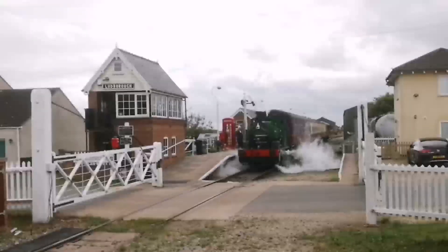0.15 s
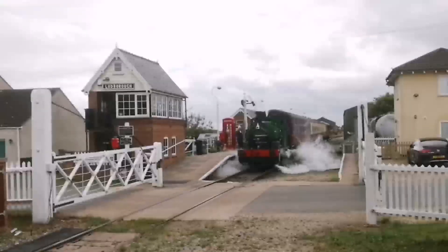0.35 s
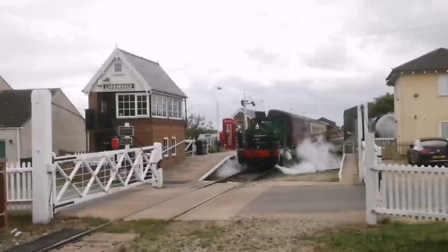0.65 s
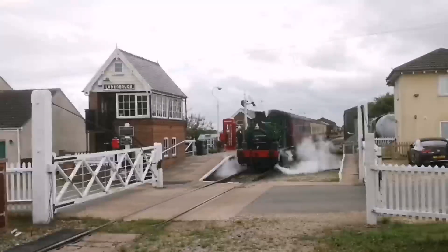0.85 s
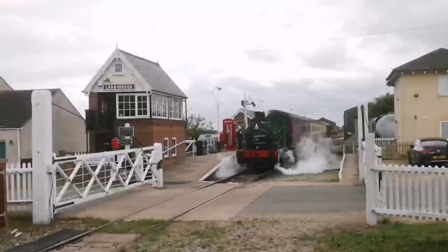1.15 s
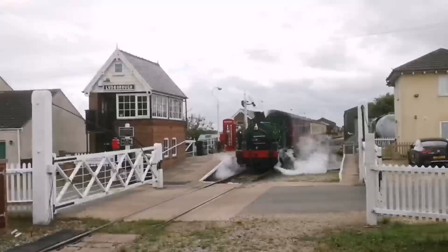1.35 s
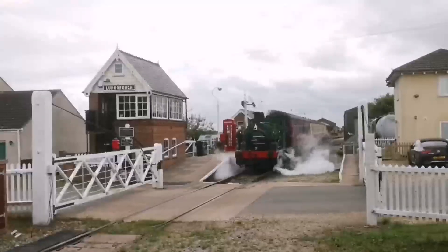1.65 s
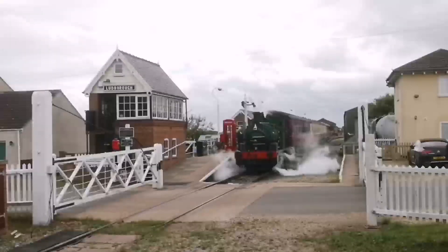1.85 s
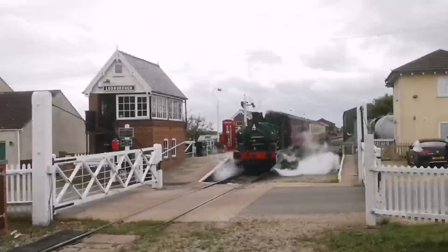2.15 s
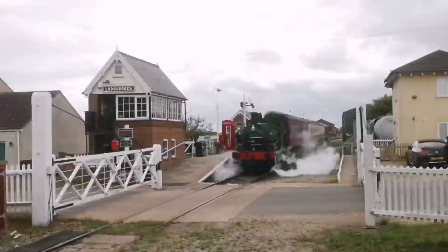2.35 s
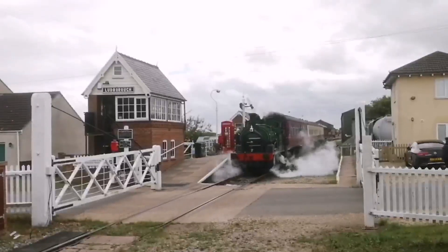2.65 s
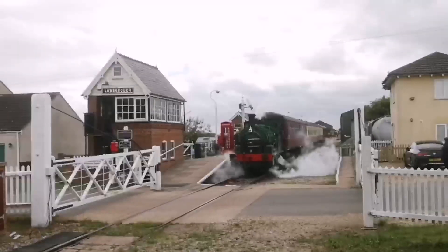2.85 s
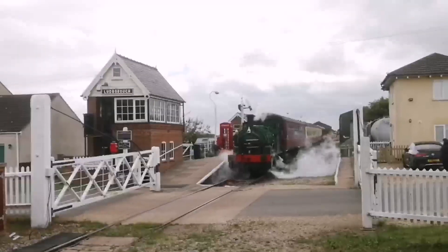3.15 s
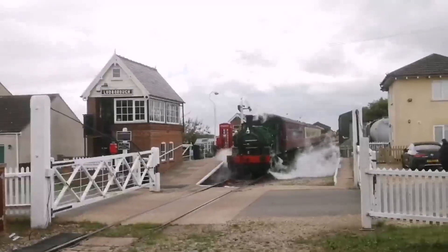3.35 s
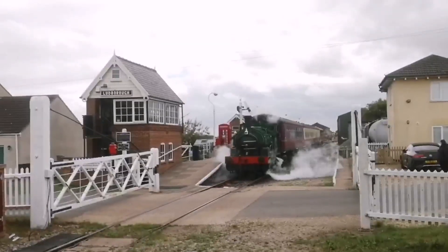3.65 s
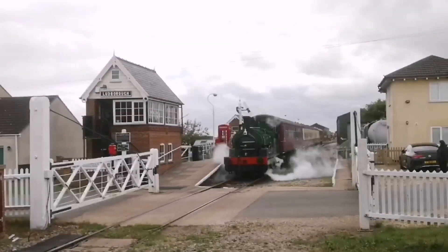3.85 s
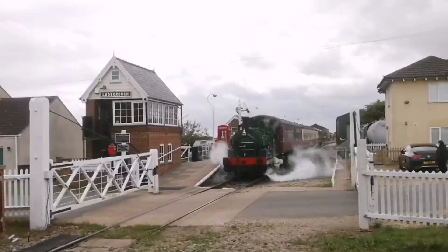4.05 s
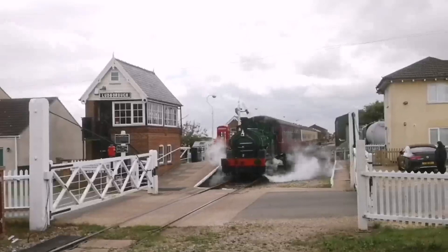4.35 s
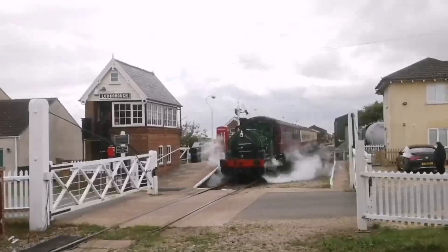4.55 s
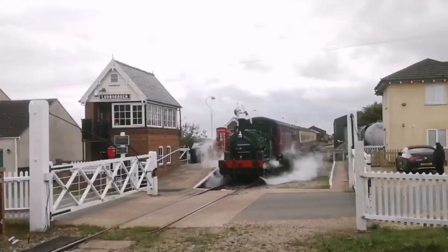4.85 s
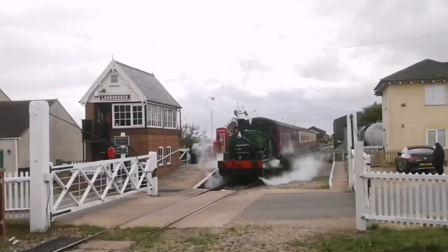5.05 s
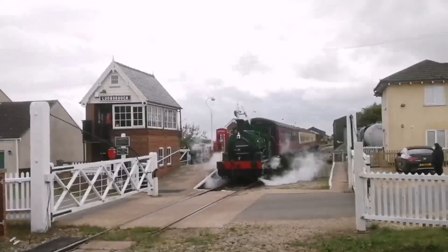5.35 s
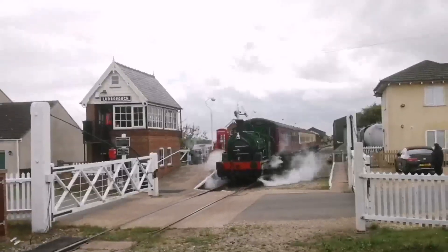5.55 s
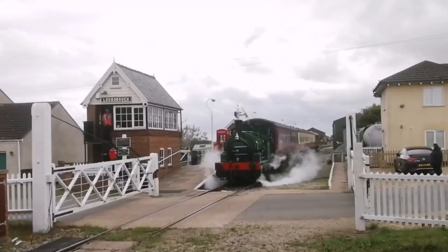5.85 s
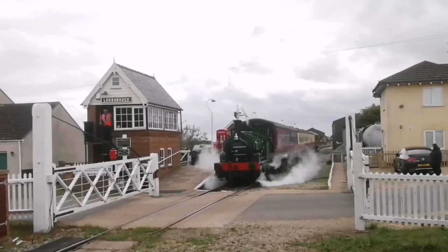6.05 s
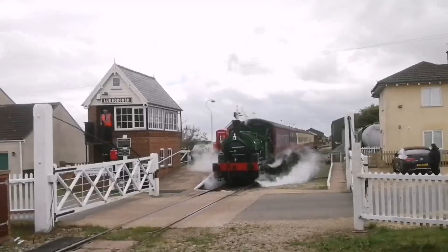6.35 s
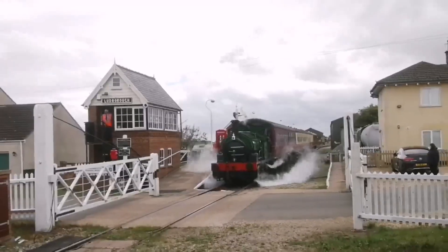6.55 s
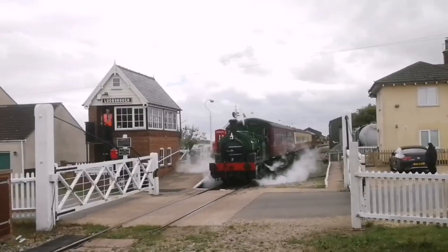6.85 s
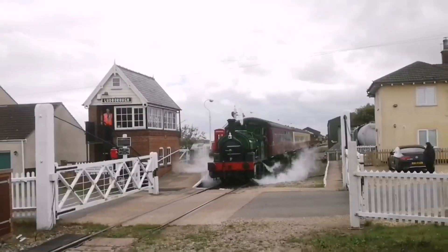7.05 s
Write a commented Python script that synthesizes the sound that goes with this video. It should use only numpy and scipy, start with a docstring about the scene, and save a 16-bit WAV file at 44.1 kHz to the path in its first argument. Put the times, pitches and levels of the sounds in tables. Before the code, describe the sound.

Bright steam hiss swells and eases from a slow locomotive over a faint low hum, until wind briefly buffets the microphone.

```python
"""Steam locomotive with open drain cocks

A locomotive creeps towards a level crossing, some thirty metres off. Spray hisses, steam rings the drain
pipes and the cloud's roar swells with each slow piston stroke. The chimney puffs softly and an engine
idles nearby with a low hum. Late on, gusts of wind thump on the microphone."""
import sys
import numpy as np
from scipy import signal
from scipy.fft import rfft, irfft, next_fast_len
from scipy.io import wavfile

SR = 44100
rng = np.random.default_rng(int(sys.argv[2]) if len(sys.argv) > 2 else 0)


def log_audio(samples):
    """Write samples as a 16-bit WAV file to the path given in sys.argv[1]."""
    # one column per channel
    frames = np.atleast_2d(samples).T
    # limit to full scale, then quantise
    limited = np.clip(frames, -1, 1)
    pcm = np.round(limited * 32767).astype(np.int16)
    wavfile.write(sys.argv[1], SR, pcm)


N = 317961

# Fine spray at the nozzles, until the cocks shut near the end.
# Each row: time in seconds, relative level in dB.
SPRAY_LEVEL = [(0, -42.5), (.4, -43.5), (.65, -38.5), (1.08, -37.5), (1.15, -35), (1.9, -35.5),
               (1.94, -42.5), (2.0, -38), (2.2, -40.5), (2.36, -35.5), (2.49, -39.5), (2.53, -40),
               (2.77, -45.5), (3.25, -46), (3.45, -44.5), (4.2, -44), (4.55, -42.5), (4.9, -39.5),
               (5.12, -44), (5.37, -41), (5.42, -47.5), (5.68, -41), (6.0, -40), (6.22, -44), (6.35, -40.5),
               (6.69, -44), (6.75, -55), (7.21, -52.5)]
# Broad rush of steam through the drain pipes. Each row: time in seconds, relative level in dB.
RUSH_LEVEL = [(0, -61), (.35, -58.5), (.6, -56), (.8, -62.5), (1.3, -60), (1.8, -63.5), (2.15, -56),
              (2.485, -55), (2.505, -59.5), (2.75, -60.5), (3.0, -64.5), (4.1, -68.5), (4.32, -57.5),
              (4.65, -60), (5.04, -60.5), (5.14, -54.5), (5.38, -53), (5.42, -58.5), (5.85, -58.5),
              (6.55, -57.5), (6.69, -60), (6.75, -69), (7.21, -64)]
# Piston strokes, about one a second.
# Each row: middle in seconds, half length in seconds, relative levels of roar and hoot in dB.
STROKES = [(.4, 0.35, -58.5, -69), (1.026, 0.21, -67, -73), (2.236, 0.23, -62.5, -59),
           (3.281, 0.27, -60.5, -67.5), (4.196, 0.45, -62, -78), (5.376, 0.28, -57.5, -69),
           (6.452, 0.33, -64, -71.5), (7.1, 0.24, -63.5, -75)]
# The drain pipes' three resonances. Each row: time in seconds, pitch in Hz, relative level in dB.
LOW_RING = [(0, 2730, -57), (.42, 2711, -51.5), (.9, 2723, -54.5), (1.45, 2783, -62.5), (1.9, 2718, -59),
            (2.25, 2675, -50.5), (2.65, 2597, -55), (3.05, 2530, -52.5), (3.4, 2587, -59.5),
            (3.9, 2594, -62.5), (4.85, 2595, -63), (5.25, 2544, -57.5), (5.9, 2665, -64), (6.6, 2596, -57),
            (6.8, 2670, -65)]
MIDDLE_RING = [(0, 3230, -72), (.85, 3345, -58), (1.4, 3330, -67), (1.75, 3290, -64), (2.4, 3310, -61.5),
               (3.0, 3240, -66.5), (3.9, 3340, -69), (4.5, 3490, -59.5), (4.95, 3510, -60.5),
               (5.4, 3384, -62), (6.3, 3277, -60), (7.21, 3143, -70.5)]
TOP_RING = [(0, 4483, -65), (.8, 4452, -57.5), (1.4, 4450, -59), (1.8, 4433, -57), (2.4, 4580, -54.5),
            (2.55, 4450, -58), (2.9, 4443, -71), (3.5, 4474, -62), (3.9, 4460, -60.5), (4.6, 4500, -59.5),
            (5.08, 4470, -67), (5.19, 4480, -52.5), (5.45, 4380, -68), (6.3, 4330, -56.5), (6.8, 4540, -83),
            (7.21, 4500, -77)]
# A small singing leak. Each row: time in seconds, relative level in dB.
LEAK_LEVEL = [(0, -61.5), (.6, -58.5), (1.05, -56.5), (1.7, -63.5), (2.25, -55.5), (2.65, -61),
              (3.1, -59.5), (3.33, -56), (3.68, -59.5), (3.8, -65.5), (4.04, -68), (4.1, -58.5), (4.4, -59),
              (4.53, -57), (4.75, -59.5), (5.4, -64), (5.49, -56), (5.6, -66.5), (6.6, -60.5), (6.9, -58.5),
              (7.21, -57)]
# The band that makes the hiss hollow when it sinks. Each row: time in seconds, gain in dB.
HOLLOW_GAIN = [(0, 3), (.9, -2.5), (1.6, -1), (2.4, -2), (3.0, -6), (4.1, -4), (4.35, -5), (4.65, -7),
               (5.05, -11), (5.25, -4.5), (6.5, 0.5), (6.8, -5)]
# Exhaust beats from the chimney. Each row: start in seconds, level at the crest in dB.
CHUFFS = [(1.48, -62), (2.775, -52), (3.79, -59.5), (4.769, -57.5), (6.75, -52.5)]
# Tone colours of the steam sounds. Each row: frequency in Hz, relative level in dB.
SPRAY_COLOUR = [(3500, -51), (4750, -33), (5050, -22.5), (5400, -9), (5700, -8.5), (6150, -5), (6500, -2.5),
                (6680, 0.5), (6900, -2.5), (7150, -2.5), (7340, -6), (7550, -16), (7750, -43.5)]
RUSH_COLOUR = [(900, -28), (1500, -15), (1900, 0), (2100, 0.5), (2350, 1.5), (3100, 1.5), (3400, 0.5),
               (3600, -1.5), (3860, 4), (4090, 1.5), (4300, 4.5), (4550, 2.5), (4780, 2.5), (5500, 7),
               (7500, -24.5)]
CLOUD_COLOUR = [(30, -3), (150, -3), (280, -6), (410, -12), (560, -1.5), (680, 0), (830, -10), (1030, 3.5),
                (1200, -3), (1350, 2.5), (1600, -2.5), (2200, -1), (3200, -2.5), (4000, -22)]
LEAK_COLOUR = [(1000, -33), (1640, -10.5), (1770, 3), (1890, 0), (2080, -5.5), (2600, -17), (3300, -20),
               (4000, -34)]
CHUFF_COLOUR = [(60, -22.5), (130, -6.5), (165, 13), (215, -6.5), (300, -8), (430, -14), (660, -12),
                (850, -19), (1400, -33)]

# The bed of breeze. Each row: time in seconds, relative level in dB.
BREEZE_LEVEL = [(0, -65.5), (.7, -80.5), (2.4, -80), (2.85, -64.5), (4.5, -67.5), (5.0, -56.5), (5.45, -49),
                (5.8, -44), (5.96, -51), (6.17, -61.5), (6.45, -56.5), (6.7, -67), (7.21, -63)]
# Gusts on top of it. Each row: start in seconds, length in seconds, relative level in dB.
GUSTS = [(3.319, 0.093, -58.5), (5.106, 0.078, -43.5), (5.362, .085, -48), (5.485, 0.12, -42.5),
         (5.645, 0.068, -47), (5.715, 0.077, -37), (5.856, 0.068, -45.5), (6, 0.1, -44), (6.256, 0.16, -47),
         (6.473, 0.075, -52), (6.757, 0.042, -53), (6.95, 0.022, -53.5)]
# Single thumping eddies. Each row: middle in seconds, relative peak in dB, half width in seconds.
BUFFETS = [(5.122, -31.5, .0016), (5.139, -39, 0.0011), (5.166, -37, 0.0019), (5.19, -29.5, 0.0014),
           (5.221, -34, 0.0025), (5.325, -27, 0.0018), (5.371, -31.5, 0.0023), (5.402, -33, 0.002),
           (5.44, -36, 0.0016), (5.501, -25.5, 0.0015), (5.508, -26, 0.0024), (5.548, -29, .0012),
           (5.574, -25, 0.0024), (5.591, -18.5, 0.001), (5.596, -25, 0.0019), (5.661, -32.5, 0.0017),
           (5.684, -24.5, 0.0015), (5.715, -29, 0.0023), (5.722, -24, 0.0015), (5.728, -29.5, 0.0014),
           (5.736, -21, 0.001), (5.743, -19.5, 0.0012), (5.755, -27, 0.0017), (5.762, -21, 0.0006),
           (5.781, -18.5, 0.00099), (5.857, -27.5, 0.0022), (5.903, -35, 0.0023), (6.022, -32, 0.0021),
           (6.043, -35, .0012), (6.082, -28.5, 0.0012), (6.098, -30, 0.00088), (6.264, -35, .002),
           (6.272, -31, 0.0015), (6.279, -27, 0.0016), (6.307, -37, 0.0014), (6.335, -33.5, 0.0012),
           (6.386, -39.5, 0.0011), (6.489, -31.5, .006), (6.532, -38, 0.0014), (6.58, -36.5, 0.0036)]
# Tone colours of the wind's rumble and strongest gust. Each row: frequency in Hz, relative level in dB.
WIND_COLOUR = [(15, -19.5), (45, 5.5), (90, 5.5), (130, 4), (180, -2), (280, -7), (420, -17.5),
               (700, -26.5), (1300, -53), (2500, -76.5)]
SQUALL_COLOUR = [(90, -16), (190, 0), (350, -1), (700, -8), (1100, -14), (1700, -23), (3000, -52)]

# The idling engine's hum. Each row: time in seconds, firing note in dB, base level of overtones in dB.
HUM_LEVEL = [(0, -58, -83), (.6, -60.5, -79), (1.4, -63.5, -83.5), (2.3, -62, -79.5), (2.9, -60, -68),
             (3.5, -57.5, -69.5), (4.3, -59.5, -73.5), (6.8, -57.5, -71), (7.21, -53.5, -66.5)]
# Its overtones. Each row: multiple of the firing rate, offset from the base level in dB.
HUM_OVERTONES = [(2, 0), (3, 0), (4, -9)]


def nozzle_spray():
    """Bright spray and a breathy whistle leave the nozzles; strong spray spreads down in pitch."""
    spray_db, = curves(SPRAY_LEVEL)
    spray = jet(SPRAY_COLOUR, spray_db - 0.7, surge_db=1.04, sputter_db=0.82)
    skirt_db = spray_db - 19 + 0.62 * (spray_db - spray_db.max())
    skirt = from_db(skirt_db) * resonance(5020, width_hz=240)
    whistle_gain = from_db(spray_db - 9.5 + 1.5 * drift(7.4))
    whistle = whistle_gain * resonance(6914 + 50 * drift(1.2), width_hz=220)
    return spray + skirt + whistle


def drain_pipes():
    """Steam rushes through and rings three resonances, which shift with the mix of steam and water."""
    rush_db, = curves(RUSH_LEVEL)
    low_hz, low_db = curves(LOW_RING)
    middle_hz, middle_db = curves(MIDDLE_RING)
    top_hz, top_db = curves(TOP_RING)
    rush = jet(RUSH_COLOUR, rush_db + 8.0, surge_db=0.9, sputter_db=1.47)
    low = from_db(low_db + 0.5 + 0.6 * drift(5.8)) * resonance(low_hz, width_hz=376)
    middle = from_db(middle_db) * resonance(middle_hz, width_hz=180)
    top = from_db(top_db) * resonance(top_hz, width_hz=280)
    return rush + low + middle + top


def piston_strokes():
    """Each stroke swells the steam cloud's resting roar and blows a hollow hoot."""
    t = np.arange(N) / SR
    roar_power, hoot_power = from_db(-63.5) ** 2, 1e-12  # between strokes
    for middle_s, half_s, roar_db, hoot_db in STROKES:
        swell = np.exp(-((t - middle_s) / half_s) ** 2)
        roar_power += swell * from_db(roar_db) ** 2
        hoot_power += swell * from_db(hoot_db) ** 2
    roar = jet(CLOUD_COLOUR, 10 * np.log10(roar_power) + 1.26, surge_db=0.57, sputter_db=1.0)
    hoot = np.sqrt(hoot_power) * resonance(1337, width_hz=260)
    return roar + hoot


def gland_leak():
    """A small leak sings on under the jets."""
    leak_db, = curves(LEAK_LEVEL)
    return jet(LEAK_COLOUR, leak_db - 0.5, surge_db=0.6, sputter_db=0.5)


def jet(colour, level_db, surge_db, sputter_db):
    """A steam jet surges slowly and sputters as drops of condensate pass through it."""
    return turbulence(colour) * from_db(level_db + surge_db * drift(6.8) + sputter_db * drift(43))


def hollow_gap(hiss, centre_hz, width_hz):
    """A gap below the brightest part of the hiss opens and fills."""
    gap_db, = curves(HOLLOW_GAIN)
    notched = signal.lfilter(*signal.iirnotch(centre_hz, centre_hz / width_hz, fs=SR), hiss)
    return notched + from_db(gap_db) * (hiss - notched)


def brief_dip(hiss, middle_s, half_s, gain_db):
    """The hiss ducks once, briefly."""
    bell = np.exp(-((np.arange(N) / SR - middle_s) / half_s) ** 2)
    return hiss * from_db(gain_db * bell)


def chimney(rise_s, decay_s):
    """With the regulator barely open, each exhaust beat is a soft, breathy puff."""
    t, envelope = np.arange(N) / SR, np.zeros(N)
    for start_s, db in CHUFFS:
        age = np.maximum(t - start_s, 0)
        attack = np.minimum(age / rise_s, 1)
        tail = np.exp(-np.maximum(age - rise_s, 0) / decay_s)
        envelope += from_db(db) * attack * tail
    return envelope * turbulence(CHUFF_COLOUR)


def reflections(direct, echo_db, lag_growth_per_s):
    """Ground and buildings add echoes whose lags shift as the locomotive rolls nearer."""
    t, mix = np.arange(N) / SR, direct.copy()
    for first_lag_s in (0.0025, 0.0093, 0.021):
        lag_s = first_lag_s * (1 + lag_growth_per_s * t)
        mix += from_db(echo_db) * np.interp(t - lag_s, t, direct, left=0)
    return mix


def wind_rumble(attack_s, release_s, lumpy_db):
    """Wind rumbles on the microphone; each gust rises, holds and dies away over the breeze."""
    t = np.arange(N) / SR
    breeze_db, = curves(BREEZE_LEVEL)
    power = from_db(breeze_db) ** 2
    for start_s, length_s, db in GUSTS:
        attack = np.clip((t - start_s) / attack_s, 0, 1)
        release = np.exp(-np.maximum(t - start_s - length_s, 0) / release_s)
        power += (from_db(db) * attack * release) ** 2
    return turbulence(WIND_COLOUR) * np.sqrt(power) * from_db(0.27 + lumpy_db * drift(33))


def squall(peak_s, swell_s, fade_s, level_db):
    """The strongest gust swells into a dense, rough puff."""
    age = np.arange(N) / SR - peak_s
    envelope = np.exp(-(age / np.where(age < 0, swell_s, fade_s)) ** 2)
    return from_db(level_db) * envelope * turbulence(SQUALL_COLOUR)


def buffets(trim_db, low_cut_hz):
    """Each eddy is one sharp push or pull on the diaphragm, between two shallow swings the other way."""
    t, thumps = np.arange(N) / SR, np.zeros(N)
    for middle_s, db, half_s in BUFFETS:
        away = ((t - middle_s) / half_s) ** 2
        pulse = (1 - away) / (1 + away) ** 2
        thumps += rng.choice([-1, 1]) * from_db(db + trim_db) * pulse
    return signal.sosfilt(signal.butter(1, low_cut_hz, "high", fs=SR, output="sos"), thumps)


def idling_engine(firing_hz, waver, flutter_db):
    """A low hum: the firing rate wavers a little and its overtones flutter."""
    note_db, overtones_db = curves(HUM_LEVEL)
    phase = 2 * np.pi * np.cumsum(firing_hz * (1 + waver * drift(2.7))) / SR
    hum = from_db(note_db) * np.sin(phase)
    for multiple, offset_db in HUM_OVERTONES:
        gain = from_db(overtones_db + offset_db + flutter_db * drift(0.89))
        hum += gain * np.sin(multiple * phase + rng.uniform(0, 2 * np.pi))
    return np.sqrt(2) * hum


def turbulence(colour):
    """Noise of unit rms in the given tone colour, rolled off above its highest point."""
    size = next_fast_len(N)
    hz = np.maximum(np.arange(size // 2 + 1) * SR / size, 1)
    colour_hz, colour_db = np.transpose(colour)
    gain = from_db(np.interp(np.log(hz), np.log(colour_hz), colour_db))
    gain /= 1 + (hz / colour_hz[-1] / 2) ** 4
    spectrum = rfft(rng.standard_normal(size)) * gain
    return unit_rms(irfft(spectrum, size)[:N])


def resonance(centre_hz, width_hz):
    """Noise of unit rms ringing around one pitch, which may glide."""
    low_pass = signal.butter(2, width_hz / 2, fs=SR, output="sos")
    slow = signal.sosfilt(low_pass, rng.standard_normal((2, N)))
    phase = 2 * np.pi * np.cumsum(centre_hz * np.ones(N)) / SR
    return unit_rms(slow[0] * np.cos(phase) + slow[1] * np.sin(phase))


def drift(rate_hz):
    """Smooth random modulation of unit rms, moving mostly below the given rate."""
    hop, settle = 40, 2000  # samples per step, steps of run-in
    pole = np.exp(-2 * np.pi * rate_hz * hop / SR)
    noise = rng.standard_normal(N // hop + settle + 2)
    slow = signal.lfilter([1], [1, -2 * pole, pole * pole], noise)[settle:]
    return np.interp(np.arange(N) / hop, np.arange(len(slow)), unit_rms(slow))


def curves(rows):
    """One automation curve, sample by sample, for each column after the time."""
    times_s, *columns = np.transpose(rows)
    return [np.interp(np.arange(N) / SR, times_s, column) for column in columns]


def from_db(db):
    """Decibels to gain."""
    return 10 ** (np.asarray(db) / 20)


def unit_rms(x):
    """Scale to an rms of one."""
    return x / np.sqrt(np.mean(x ** 2) + 1e-20)


def scene():
    """Locomotive, wind and hum in one mono mix, alike in both channels."""
    steam = nozzle_spray() + drain_pipes() + piston_strokes() + gland_leak()
    steam = hollow_gap(steam, centre_hz=4070, width_hz=440)
    steam = brief_dip(steam, middle_s=5.598, half_s=0.019, gain_db=-5)
    puffs = chimney(rise_s=0.038, decay_s=0.066)
    locomotive = reflections(steam + puffs, echo_db=-17.0, lag_growth_per_s=0.015)
    wind = wind_rumble(attack_s=0.0046, release_s=0.01, lumpy_db=2.5)
    wind += squall(peak_s=5.733, swell_s=0.013, fade_s=0.023, level_db=-34)
    wind += buffets(trim_db=0.4, low_cut_hz=48)
    mono = locomotive + wind + idling_engine(firing_hz=80.7, waver=0.001, flutter_db=2.0)
    return np.stack([mono, mono])


def record(dry):
    """A steep low-pass takes the air off the top."""
    cutoff_hz = 7820
    return signal.sosfilt(signal.ellip(16, 0.1, 80, cutoff_hz, fs=SR, output="sos"), dry)


dry = scene()
out = record(dry)
log_audio(out)
```